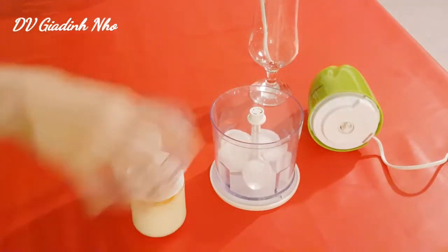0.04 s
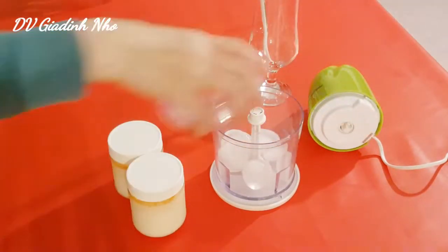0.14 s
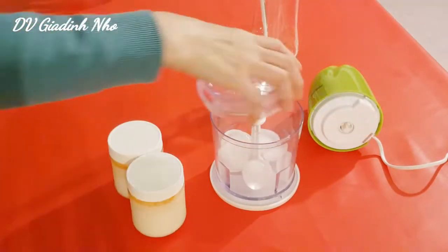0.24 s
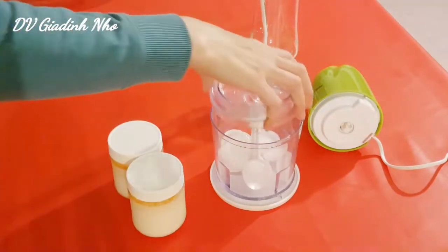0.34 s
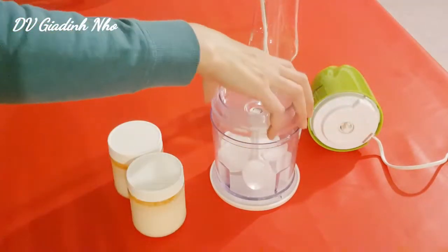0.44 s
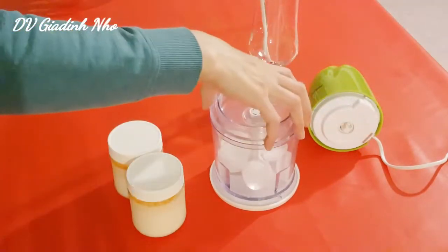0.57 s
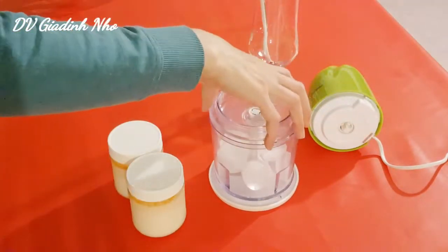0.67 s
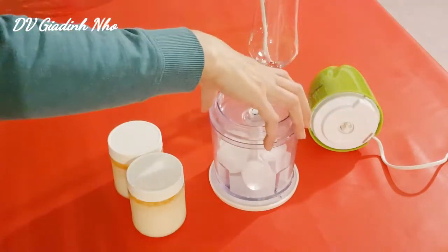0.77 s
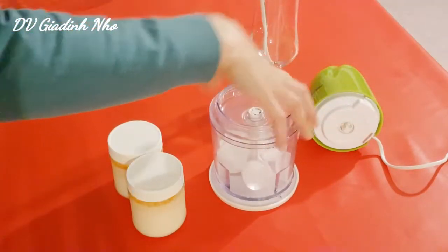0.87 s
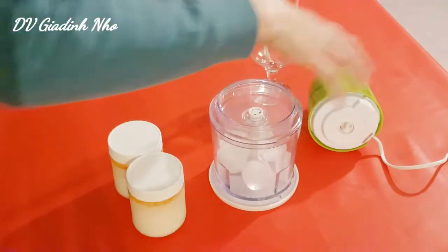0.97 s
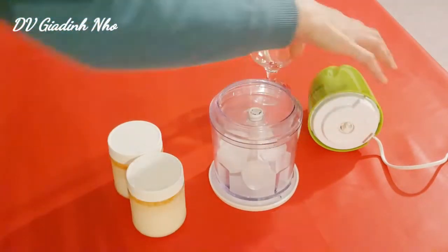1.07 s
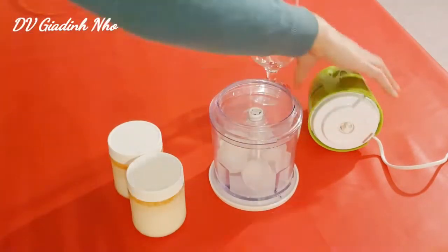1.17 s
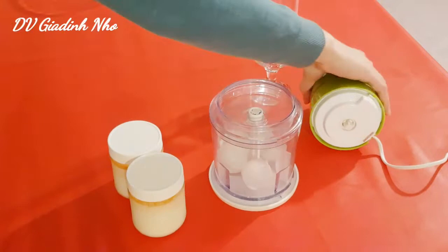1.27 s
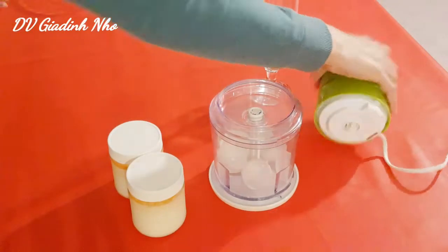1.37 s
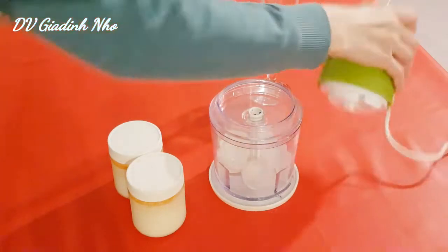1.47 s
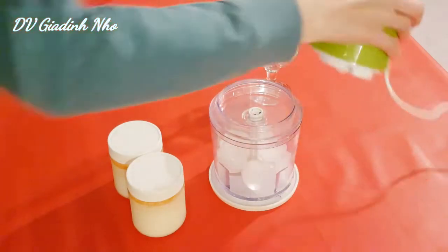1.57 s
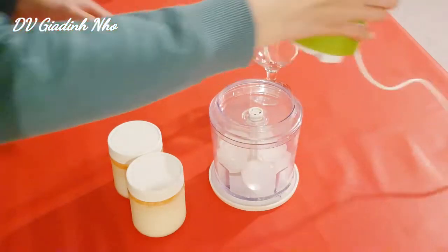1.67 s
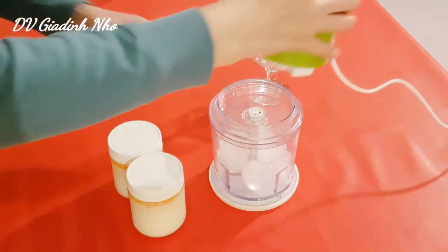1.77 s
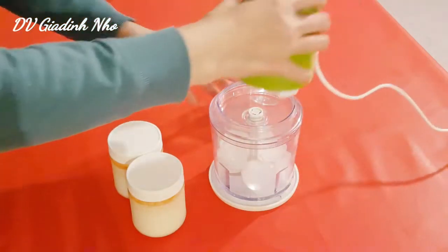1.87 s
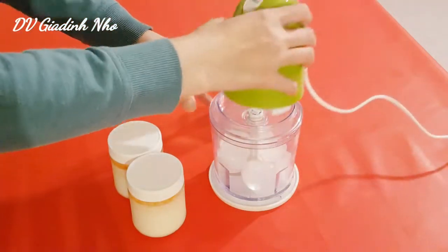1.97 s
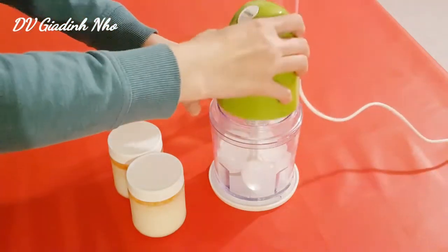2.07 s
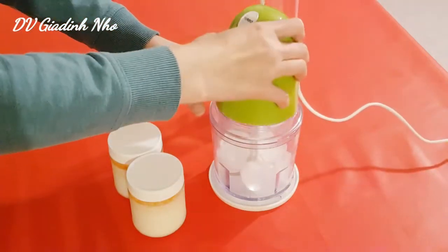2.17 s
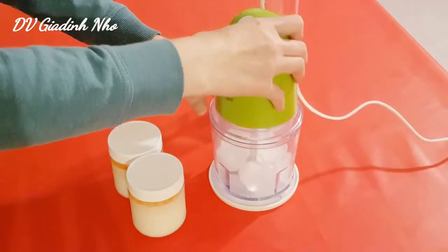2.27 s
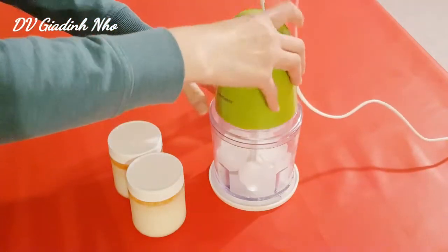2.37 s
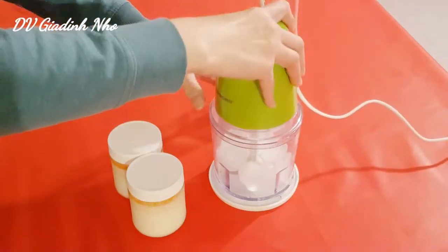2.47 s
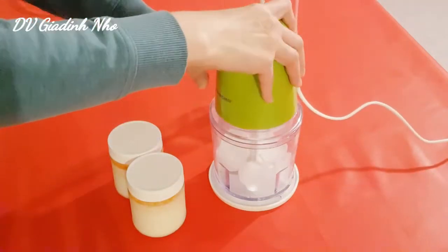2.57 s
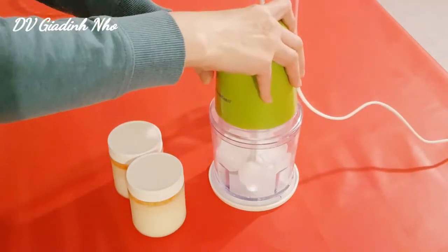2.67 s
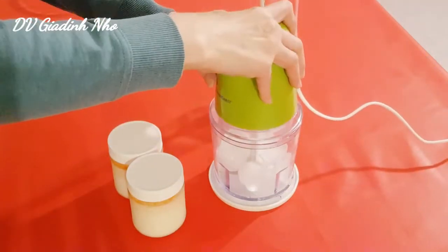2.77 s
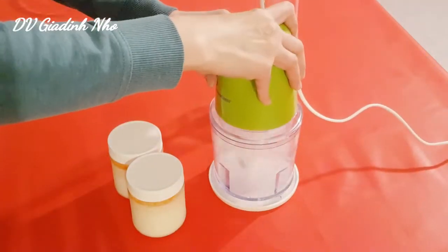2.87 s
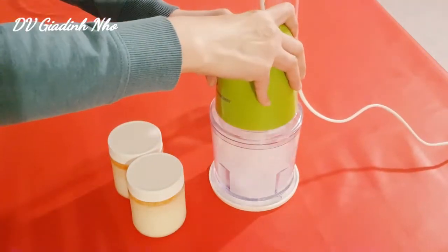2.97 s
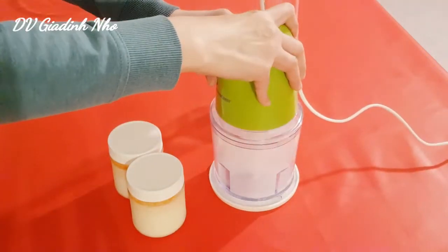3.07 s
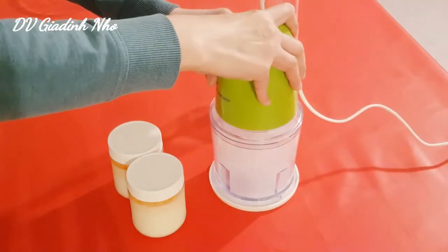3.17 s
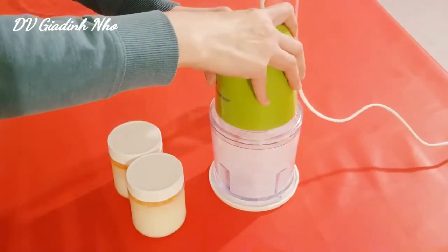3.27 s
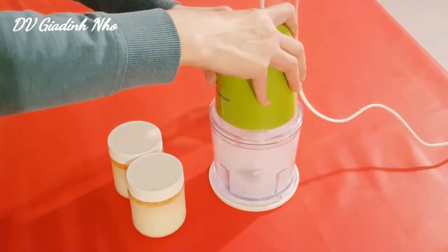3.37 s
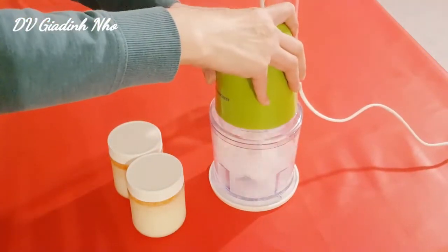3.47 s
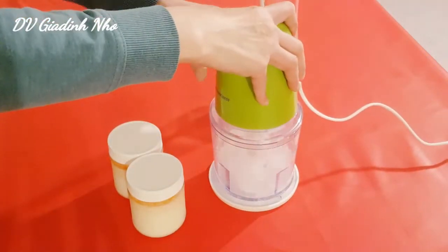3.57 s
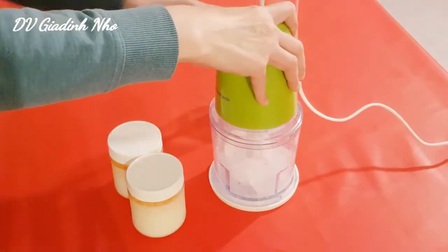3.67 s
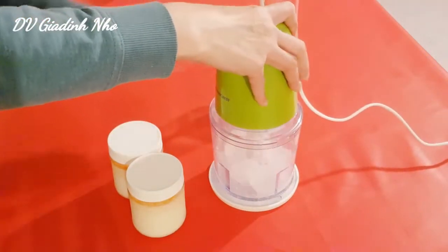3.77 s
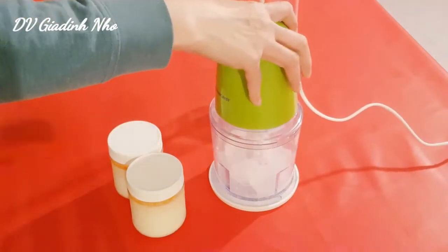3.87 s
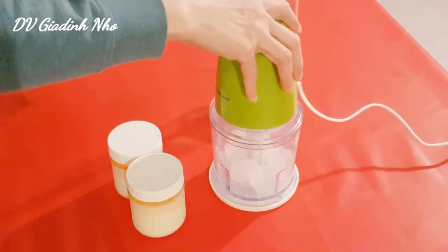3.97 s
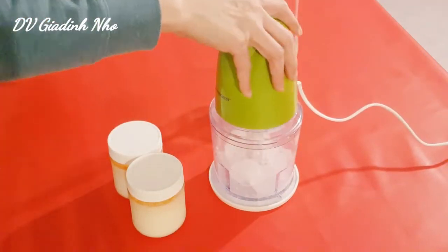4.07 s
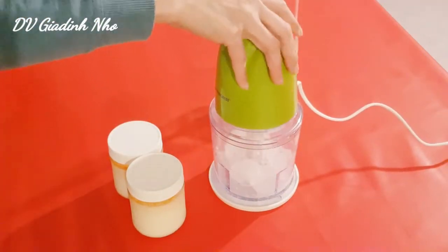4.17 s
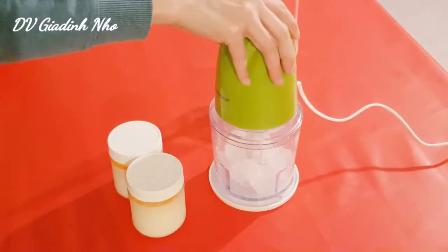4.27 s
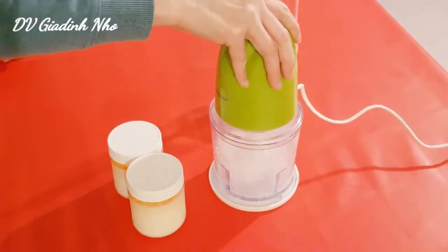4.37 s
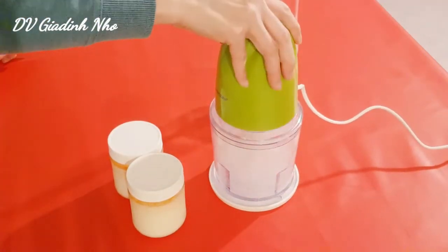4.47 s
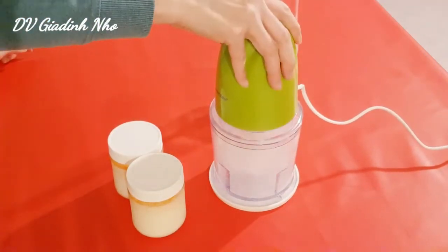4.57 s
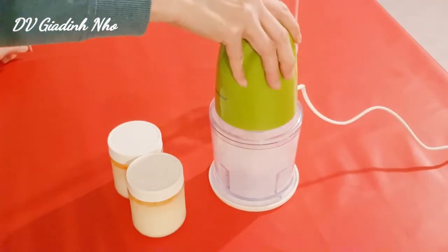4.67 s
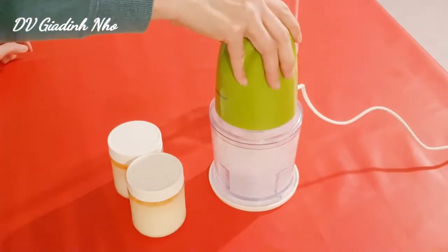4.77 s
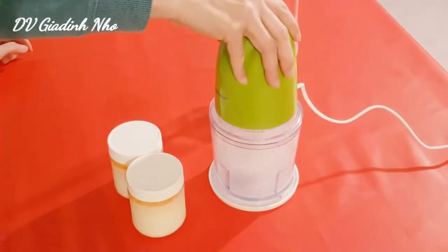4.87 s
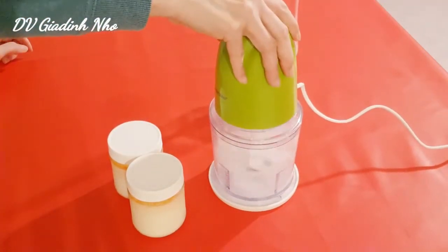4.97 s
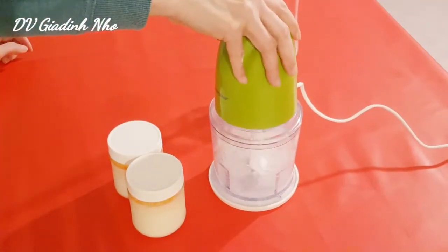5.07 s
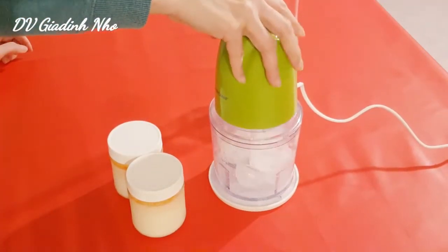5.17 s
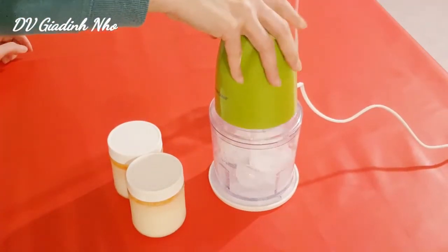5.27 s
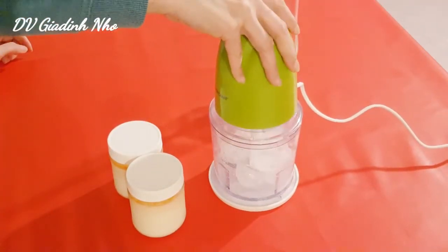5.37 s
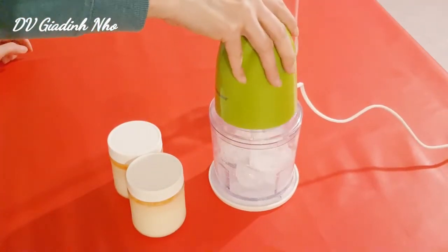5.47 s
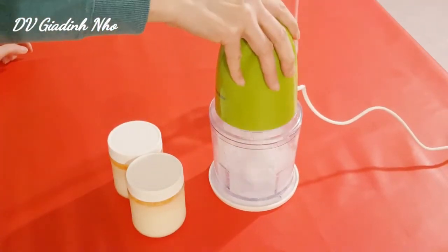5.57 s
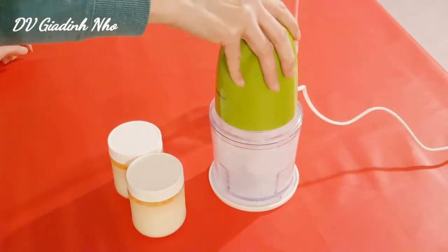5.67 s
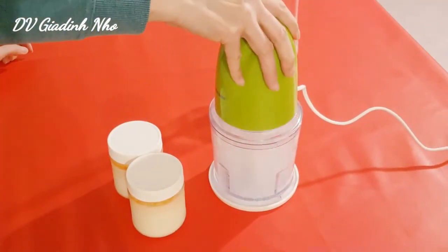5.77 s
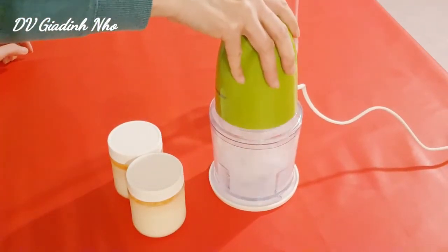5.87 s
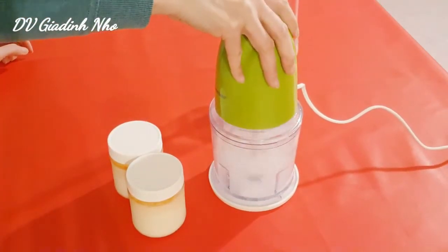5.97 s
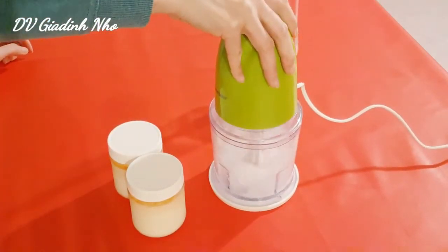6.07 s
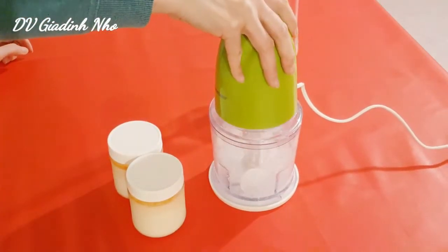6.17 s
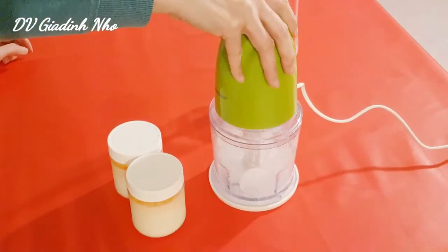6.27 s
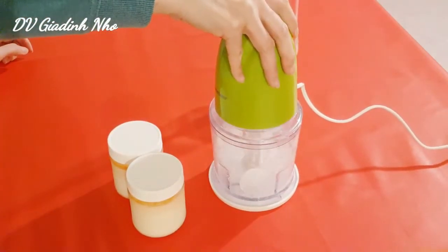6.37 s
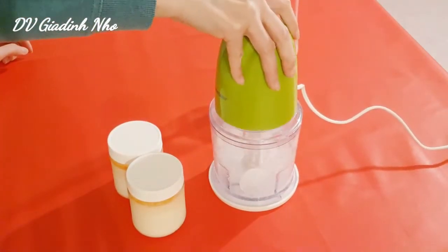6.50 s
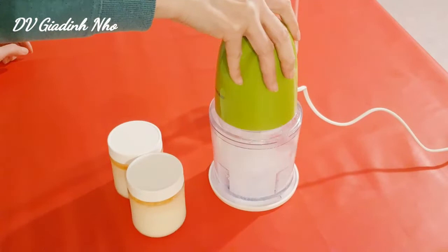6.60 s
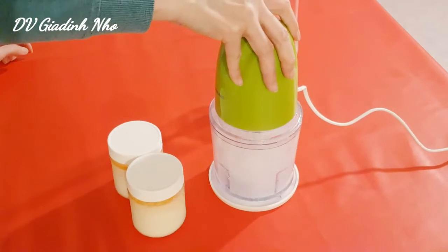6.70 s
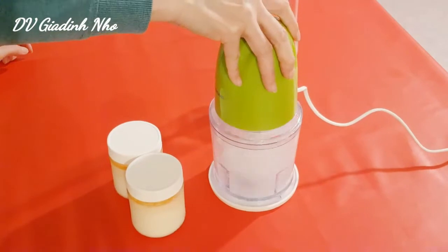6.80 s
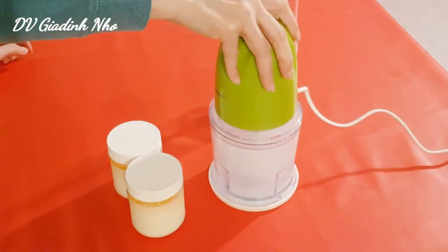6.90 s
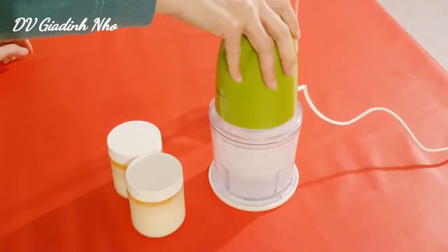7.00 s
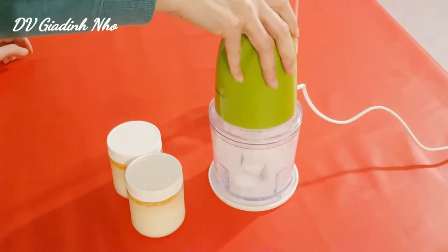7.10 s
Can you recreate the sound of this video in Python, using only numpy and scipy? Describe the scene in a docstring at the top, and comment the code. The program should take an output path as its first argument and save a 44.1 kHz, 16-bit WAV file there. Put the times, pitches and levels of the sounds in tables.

```python
"""Ice in a kitchen chopper

A small chopper on a table, close to a stereo microphone in a hard-walled room still ringing from a sound just
before the start. Steel clinks and one dull thud come first; a lid is pressed on the plastic bowl and the motor
head is seated: clicks with damped ringing modes. Four short pulses then whirl ice cubes against blade and wall:
pitched raps, spiky hiss and rumble follow the blade speed, with single cracks on top. Table and room answer with
noise tails; behind lie still air, brushing cloth and the steady low hum of a fridge far off.
"""
import sys
import numpy as np
from scipy import signal
from scipy.fft import rfft, irfft, next_fast_len
from scipy.io import wavfile
from scipy.ndimage import uniform_filter1d, map_coordinates

SR = 44100
rng = np.random.default_rng(int(sys.argv[2]) if len(sys.argv) > 2 else 0)


def to_wav(sig):
    """Store sig (one row per channel, or 1-D mono) as 16-bit WAV at the path in sys.argv[1].

    Samples outside -1..1 are clipped; the rate is SR.
    """
    pcm = np.clip(np.atleast_2d(sig), -1, 1) * 32767
    pcm = np.round(pcm).astype(np.int16)
    wavfile.write(sys.argv[1], SR, pcm.T)  # frames by channels


N = 314874  # length in samples


def amp(db):
    """dB to gain."""
    return 10 ** (np.asarray(db) / 20)


def unit(x):
    """Scaled to rms 1."""
    return x / np.sqrt(np.mean(x ** 2) + 1e-20)


def along(points, hz):
    """A curve through (f/Hz, value) points, straight between them on a log frequency axis."""
    f, value = np.transpose(points)
    return np.interp(np.log(hz + 1), np.log(f + 1), value)


def filtered(x, response):
    """x times a response of frequency."""
    m = next_fast_len(x.shape[-1] + 8192)
    spectrum = rfft(x, m) * response(np.fft.rfftfreq(m, 1 / SR))
    return irfft(spectrum, m)[..., :x.shape[-1]]


def noise(spectrum, shape=N):
    """Coloured noise of rms 1."""
    return unit(filtered(rng.standard_normal(shape), lambda hz: amp(along(spectrum, hz))))


def grains(s, hz, gain, cycles):
    """Damped sines at times s that swell within half a cycle and lose 9 dB in the given number of cycles."""
    k = np.arange(600)
    turns = hz[:, None] * k / SR
    envelope = np.exp(-turns / cycles) * (1 - np.exp(-turns / 0.25))
    waves = gain[:, None] * np.sin(2 * np.pi * turns) * envelope
    places = np.round(s * SR).astype(int)[:, None] + k
    return np.bincount(places.ravel(), waves.ravel(), N + 600)[:N]


def ring(modes, t):
    """One blow on a solid part: every mode dies at its own rate, at a new strength each time."""
    luck_db = rng.normal(0, 2, len(modes))
    return sum(amp(db + luck - 60 * t / t60) * np.sin(2 * np.pi * hz * t)
               for (hz, db, t60), luck in zip(modes, luck_db))


# each press of the switch: [on t/s, spin-up time constant/s, held/s, coasting/s, level/dB]
SWITCH_PULSES = [(2.895, 0.0086, 0.47, 0.51, -19.5), (4.43, 0.0088, .3, 0.59, -19),
                 (5.628, 0.0091, 0.28, 0.38, -21), (6.592, 0.0081, 0.42, 0.24, -19.5)]


def blade():
    """Blade speed 0-1 (quick start, even braking after release), level in dB and seconds since the press."""
    t, on = np.arange(N) / SR, np.transpose(SWITCH_PULSES)[0]
    current = np.maximum(np.searchsorted(on, t) - 1, 0)
    start, spin_up, held, coast, db = np.array(SWITCH_PULSES)[current].T
    since = np.maximum(t - start, 0)
    speed = (1 - np.exp(-since / spin_up)) * np.clip(1 - (since - held) / coast, 0, 1)
    return speed, db, since


def surge():
    """The load of ice comes and goes: a smooth random gain."""
    surge_db, surges_per_s = 0.44, 25
    knots = rng.standard_normal(int(N / SR * 60))
    return amp(surge_db * map_coordinates(knots, [np.arange(N) * surges_per_s / SR]))


def ticks():
    """Blade edge nicking ice, dry and sharp: about 150 strongly damped nicks a second, rms 1."""
    tick_hz, spread_db = 1700, 3.5
    s = rng.random(1100) * N / SR
    pitch, size = rng.standard_normal((2, 1100))
    gain = np.sign(size) * amp(spread_db * np.abs(size))
    return unit(grains(s, tick_hz * np.exp(0.55 * pitch), gain, cycles=0.41))


# colour of cubes against the bowl wall: [f/Hz, relative level/dB per Hz]
WALL_COLOUR = [(35, -57.5), (60, -27.5), (97, -24), (140, -13), (280, -17.5), (346, -4), (490, -5),
               (529, -1.5), (763, -3), (874, -0.5), (1620, -6), (2330, -2.5), (3180, -13.5), (6000, -10),
               (7800, -19.5), (13200, -120)]


def raps():
    """Cubes batter the wall in short pitched raps, over a bed of the same colour and dry ticks."""
    first_s = 2.88
    chance = rng.random((11000, 4))
    s = first_s + chance[:, 0] * (N / SR - first_s)
    hz = 120 * 40 ** chance[:, 1]
    size_db = -3.2 * np.log(1.003 - chance[:, 2])  # a few raps are much stronger
    gain = amp(along(WALL_COLOUR, hz) + size_db) * hz * np.sign(chance[:, 3] - 0.5)
    return unit(grains(s, hz, gain, cycles=1.23)) + amp(0.5) * noise(WALL_COLOUR) + amp(-1) * ticks()


# colour of splinters sanding the wall: [f/Hz, relative level/dB per Hz]
SPLINTER_COLOUR = [(1180, -51), (2000, -7), (2340, -4.5), (3170, -12), (3650, -7.5), (4340, -14),
                   (8260, -12), (9490, -18.5), (13200, -13), (15200, -21.5), (16000, -4.5)]


def hiss():
    """Splinters sand the wall: noise with a fast random level, so it is spiky, rms 1."""
    flutter_db = 3.5 * unit(uniform_filter1d(rng.standard_normal(N), size=60))
    spikes = rng.standard_normal(N) * amp(flutter_db)
    return unit(filtered(spikes, lambda hz: amp(along(SPLINTER_COLOUR, hz))))


# single cubes struck hard by the blade: [t/s, crack level/dB, f/Hz, splinter spray level/dB]
HARD_CRACKS = [(2.9083, -12.5, 850, -18), (2.9746, -1.5, 1240, -17), (3.0709, 4.5, 2440, -20),
               (3.2243, -6.5, 1980, -13), (3.5213, -4, 2290, -20.5), (3.5559, -7.5, 1310, -32),
               (3.6641, -17, 1244, -20.5), (3.709, -14, 1870, -27.5), (3.717, -14.5, 1370, -30),
               (3.725, -14, 2320, -29), (4.436, -2.5, 790, -12.5), (4.4906, -3.5, 1860, -28),
               (4.6323, -5.5, 1070, -27.5), (4.6875, -3, 920, -16), (4.8694, -5, 2120, -22),
               (4.9464, -7.5, 820, -13), (5.0145, -9, 2050, -31), (5.195, -30, 1930, -49),
               (5.6328, -12, 1060, -15.5), (5.6565, -1.5, 830, -8), (5.8664, -0.5, 2300, -11),
               (6.0663, -15, 1210, -18), (6.1976, -22, 1230, -25.5), (6.2571, -26, 1180, -33),
               (6.5961, -13.5, 766, -12.5), (6.6294, -10, 648, -29), (6.7324, 0, 674, -26),
               (6.9426, 3, 1900, -26), (7.0991, -4, 2460, -33)]


def cracks():
    """A hard-struck cube: a damped tone with one overtone, and the decaying spray level of its splinters."""
    overtone, overtone_db, spray_t60_s = 2.5, -5, 0.049
    s, db, hz, spray_db = np.transpose(HARD_CRACKS)
    tones = grains(s, hz, amp(db), cycles=2.08)
    tones = tones + grains(s, overtone * hz, amp(db + overtone_db), cycles=1.8)
    onsets = np.bincount(np.round(s * SR).astype(int), amp(spray_db), N)
    spray = signal.lfilter([1], [1, -amp(-60 / spray_t60_s / SR)], onsets)
    return tones, spray


# colour of the bowl shaking on the table: [f/Hz, relative level/dB per Hz]
RUMBLE_COLOUR = [(70, -31.5), (140, 2.5), (250, 0.5), (350, -0.5), (600, -16), (1500, -69.5)]


def ice():
    """Raps, hiss and rumble each grow as their own power of blade speed; cracks lie on top."""
    raps_law, hiss_law, rumble_law = 1.5, 2.67, 0.85  # powers of blade speed
    hiss_db, rumble_db = 4, -16.5  # relative to the level of the pulse
    wear_db_per_s = 13  # within each pulse the raps weaken as the cubes break up
    speed, level_db, since = blade()
    tones, spray = cracks()
    battering = amp(level_db - wear_db_per_s * since) * speed ** raps_law * surge()
    sanding = np.hypot(amp(level_db + hiss_db) * speed ** hiss_law * surge(), spray)
    shaking = amp(level_db + rumble_db) * speed ** rumble_law * surge()
    return shaking * noise(RUMBLE_COLOUR) + battering * raps() + sanding * hiss() + tones


# loose plastic: [f/Hz, relative level/dB per Hz]
RATTLE_COLOUR = [(100, -25.5), (250, -5), (600, 4.5), (2700, -3), (3500, -15.5), (8000, -42)]
# the hard edge of a contact: [f/Hz, relative level/dB per Hz]
SNAP_COLOUR = [(1500, -29), (3500, 1.5), (7000, -6), (9500, -10.5), (13000, -10.5), (16000, -14)]


def knocks(blows, modes):
    """A pitched click, the ring of the struck part, a short rattle and a snap of treble."""
    rattle_db, rattle_t60_s, snap_t60_s = -13, 0.038, 0.01  # rattle under click and ring together
    s, db, hz = np.transpose(blows)[:3]
    out = np.pad(grains(s, hz, amp(db), cycles=2.63), (0, SR))
    t = np.arange(SR // 3) / SR
    for s, db, _, ring_db, snap_db in blows:
        rattle_decay = amp(rattle_db - 60 * t / rattle_t60_s)
        rattle = (amp(db) + amp(ring_db)) * rattle_decay * noise(RATTLE_COLOUR, len(t))
        snap = amp(snap_db - 60 * t / snap_t60_s) * noise(SNAP_COLOUR, len(t))
        body = amp(ring_db) * ring(modes, t) * (1 - np.exp(-t / 0.00045))
        out[round(s * SR):][:len(t)] += body + rattle + snap
    return out[:N]


# motor head, switch and fingers on plastic: [t/s, click level/dB, click f/Hz, ring level/dB, snap level/dB]
HEAD_KNOCKS = [(1.0093, -49, 3500, -72, -56), (2.1296, -17, 1480, -22.5, -30),
               (2.1923, -22.5, 1580, -32.5, -44), (2.2927, -34.5, 2320, -38, -40.5),
               (2.501, -35, 2030, -37.5, -66), (2.618, -39.5, 1350, -42.5, -67.5),
               (2.8135, -38, 2060, -43, -62), (2.8544, -43, 2020, -41, -58),
               (2.888, -37.5, 890, -38.5, -58), (4.135, -46, 1710, -59, -44),
               (4.363, -36.5, 1944, -38.5, -64), (4.3934, -35, 1360, -45, -54.5),
               (5.4784, -34.5, 1214, -58, -43), (5.5742, -39, 1276, -40, -61), (5.609, -46, 1300, -33, -67),
               (6.527, -58, 496, -46, -70), (6.548, -42, 1366, -40.5, -54)]
# modes of the bowl on the table: [f/Hz, relative level/dB, t60/s]
BOWL_MODES = [(139, -2.5, 0.17), (240, 3.5, 0.033), (353, -3, 0.06), (434, 0, 0.027), (677, -3, 0.044)]


def head_knocks():
    """Motor head, switch and fingers knock the plastic and set the bowl ringing."""
    return knocks(HEAD_KNOCKS, BOWL_MODES)


# the lid pressed home on the bowl: [t/s, click level/dB, click f/Hz, ring level/dB, snap level/dB]
LID_PRESSES = [(0.531, -16, 600, -28.5, -37), (0.564, -18, 517, -49, -32), (0.594, -20.5, 430, -22.5, -20),
               (0.615, -23.5, 355, -31, -42), (0.711, -26.5, 344, -51, -51), (0.847, -35.5, 258, -72, -64)]
# modes of the lid: [f/Hz, relative level/dB, t60/s]
LID_MODES = [(143, -3, 0.057), (349, -12, 0.13), (937, -12, 0.043), (1067, -2.5, 0.19), (1820, -4.5, 0.053),
             (2330, 2.5, 0.02), (2920, -3, 0.026)]


def lid_presses():
    """The lid clicks home and rings in its own modes."""
    return knocks(LID_PRESSES, LID_MODES)


# steel touching steel: [t/s, ring level/dB, tick level/dB, tick f/Hz]
STEEL_CLINKS = [(0.0281, -52, -10.5, 3050), (0.0326, -52, -8, 2080), (0.0584, -67, -20, 3240),
                (0.063, -65, -8.5, 3160), (0.2054, -32.5, -9, 4140), (0.2118, -54, -2.5, 5130),
                (0.2241, -51, -6.5, 2230), (0.388, -36.5, -8, 2100), (0.391, -52, -4.5, 2620)]
# modes of the steel: [f/Hz, relative level/dB, t60/s]
STEEL_MODES = [(5080, -5, 0.13), (7990, -2, 0.09), (8050, -12.5, .06), (9700, -16, 0.069), (11500, -17, .1),
               (12100, -14, .1)]


def clinks():
    """Thin steel rings high with a short tick at the contact."""
    out, t = np.zeros(N), np.arange(SR // 3) / SR
    for s, db, _, _ in STEEL_CLINKS:
        out[round(s * SR):][:len(t)] += amp(db) * ring(STEEL_MODES, t)
    s, _, tick_db, hz = np.transpose(STEEL_CLINKS)
    return out + grains(s, hz, amp(tick_db), cycles=0.37)


# something heavy set down: [t/s, level/dB, t60/s]
SET_DOWN = (.218, -9.5, 0.14)
# colour of the table top: [f/Hz, relative level/dB per Hz]
TABLE_COLOUR = [(59, -34), (100, -5), (230, -4), (483, -9.5), (803, 0.5), (868, -8), (937, -5), (1560, -9),
                (1660, -10), (4000, -53), (5200, -66), (8800, -120)]


def thud():
    """A soft contact: the table top shudders, a dull and brief burst of noise."""
    s, db, t60 = SET_DOWN
    t = np.maximum(np.arange(N) / SR - s, 0)
    return amp(db - 60 * t / t60) * (1 - np.exp(-t / 0.0023)) * noise(TABLE_COLOUR)


# left-right likeness of diffuse sound at the microphone: [f/Hz, likeness 0-1]
LIKENESS = [(60, 0.96), (200, 0.96), (400, 0.83), (800, 0.49), (1500, 0.05), (15000, 0.21)]


def diffuse(pair):
    """Two unrelated signals become left and right, most alike in the bass."""
    def mid_and_side(hz):
        turn = np.arccos(np.clip(along(LIKENESS, hz), -1, 1)) / 2
        return np.array([np.cos(turn), np.sin(turn)])
    mid, side = filtered(pair, mid_and_side)
    return np.array([mid + side, mid - side])


def echoes(x, decays, step, length):
    """Each frequency dies at its own speed; sources shift about, so each slice of sound meets a new tail."""
    out = np.zeros((2, N + step + length + 300))
    for start in range(0, N, step):
        hz, t, z = signal.stft(rng.standard_normal((2, length)), SR, nperseg=256)
        decay = amp(-60 * t / along(decays, hz)[:, None])
        tail = signal.istft(z * decay, SR, nperseg=256)[1]
        tail = tail / np.linalg.norm(tail[0])
        wet = signal.fftconvolve(x[None, start:start + step], tail, axes=1)
        out[:, start + 40:][:, :wet.shape[1]] += wet  # 40 samples behind the direct sound
    return diffuse(out[:, :N])


# table top and jars close by: [f/Hz, t60/s]
NEARBY_DECAY = [(200, 0.044), (2000, 0.026), (12000, 0.036)]


def table_scatter(whirl, hands):
    """Table top and jars scatter the sound in very short tails."""
    return echoes(amp(-2.5) * whirl + amp(-5) * hands, NEARBY_DECAY, SR // 30, SR // 20)


# the hard-walled room: [f/Hz, t60/s]
ROOM_DECAY = [(150, 0.63), (500, 0.51), (1500, 0.55), (4000, 0.54), (10000, 0.41)]


def room_walls(whirl, hands):
    """The walls of the room answer in longer tails."""
    return echoes(amp(-0.5) * whirl + amp(1.0) * hands, ROOM_DECAY, SR // 8, 3 * SR // 4)


# first row: the room still ringing from a sound just before the start; other rows: cloth and cable brushing:
# [loudest t/s, peak level/dB, swell/dB per s, fade/dB per s]
SOFT_SWELLS = [(.005, -46, 100, 104), (1.32, -64, 300, 148), (1.729, -55, 96, 76), (4.15, -47, 600, 70),
               (5.48, -50, 1999, 107)]
# colour shared by that ringing and the brushing: [f/Hz, relative level/dB per Hz]
SOFT_COLOUR = [(470, -38.5), (800, -7), (1070, -20), (1160, -15), (1460, -5), (2760, -4.5), (15000, -30.5)]
# colour of the still air of the house: [f/Hz, relative level/dB per Hz]
AIR_COLOUR = [(12, -36.5), (20, -15.5), (32, -24.5), (101, -11), (142, -17), (182, -15.5), (270, -19.5),
              (301, -16), (459, -22), (660, -22), (897, -25), (976, -25.5), (1150, -27.5), (5080, -44),
              (16000, -50)]


def swell_and_fade(s, db, swell, fade):
    """A gain that rises to its peak at time s and falls again, both evenly in dB."""
    t = np.arange(N) / SR
    return amp(db - np.maximum(swell * (s - t), fade * (t - s)))


def background():
    """Still air, the room's opening ring, brushing cloth and a slightly unsteady hum, the fridge far off."""
    air_db, hum_db, hum_hz = -54.5, -60, 100  # air as rms, hum as mean peak
    t = np.arange(N) / SR
    sway = unit(uniform_filter1d(rng.standard_normal(N), size=3000))
    hum = amp(hum_db + 1.3 * sway) * np.sin(2 * np.pi * hum_hz * t)
    opening_ring = swell_and_fade(*SOFT_SWELLS[0])
    brushing = sum(swell_and_fade(*row) for row in SOFT_SWELLS[1:])
    soft = (opening_ring + brushing) * noise(SOFT_COLOUR, (2, N))
    air = amp(air_db) * noise(AIR_COLOUR, (2, N))
    return diffuse(air + soft) + hum


def scene():
    """Small things radiate no deep bass; the direct sound reaches the right side two samples early."""
    whirl = ice()
    hands = head_knocks() + lid_presses() + clinks() + thud()
    near = amp(-3.0) * whirl + hands
    direct = np.array([np.roll(near, 2), near])
    table = direct + table_scatter(whirl, hands) + room_walls(whirl, hands)
    return filtered(table, lambda hz: (1j * hz / (95 + 1j * hz)) ** 3) + background()


# colour of the two sides of the microphone: [f/Hz, left minus right level/dB]
PORT_COLOUR = [(60, 2.5), (180, -1), (550, -0.5), (1650, 1.0), (4970, 0), (15000, -2)]


def record(dry):
    """The two sides differ in colour; peaks round off near full scale; nothing stays above the band limit."""
    top_hz = 15800
    left_right = np.array([[1], [-1]])
    ports = filtered(dry, lambda hz: amp(along(PORT_COLOUR, hz) / 2 * left_right))
    rounded = ports / (1 + np.abs(ports / 1.05) ** 8) ** (1 / 8)
    return filtered(rounded, lambda hz: np.clip((top_hz - hz) / 300, 0, 1) ** 2)


dry = scene()
out = record(dry)
to_wav(out)
```